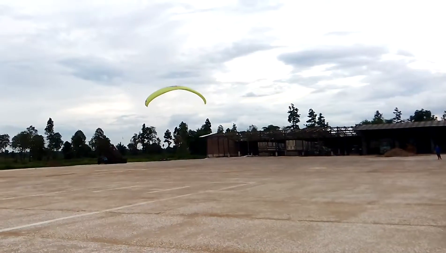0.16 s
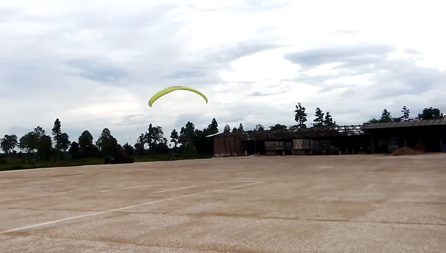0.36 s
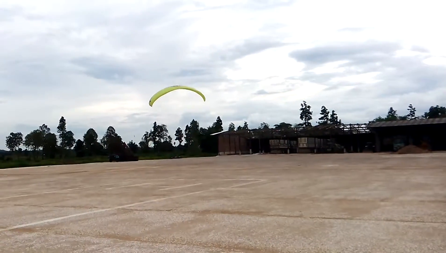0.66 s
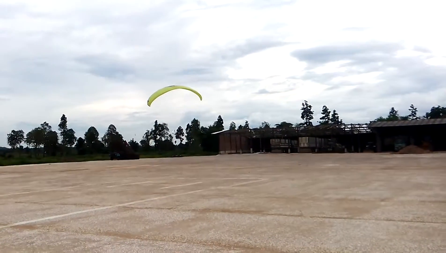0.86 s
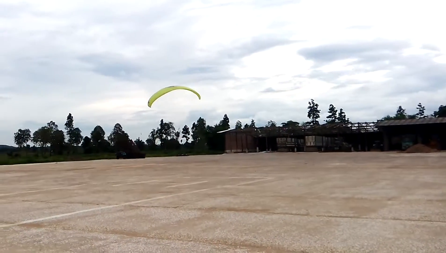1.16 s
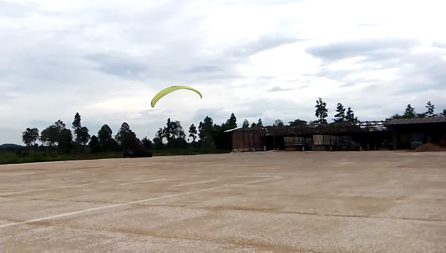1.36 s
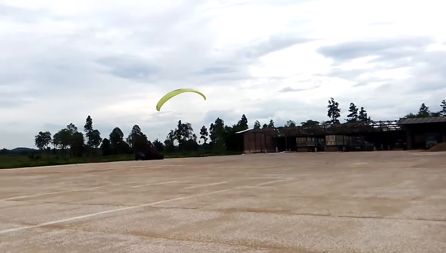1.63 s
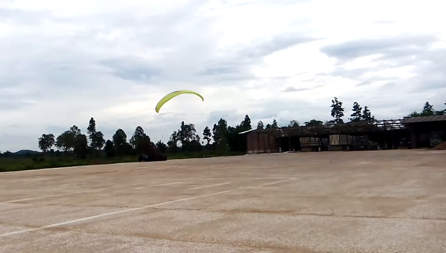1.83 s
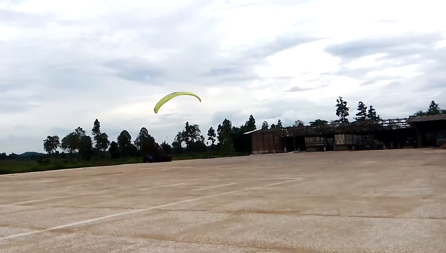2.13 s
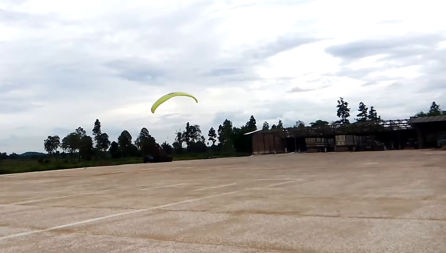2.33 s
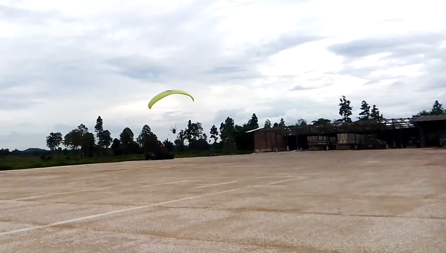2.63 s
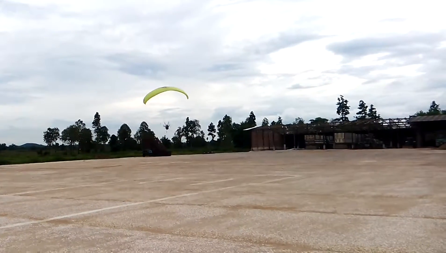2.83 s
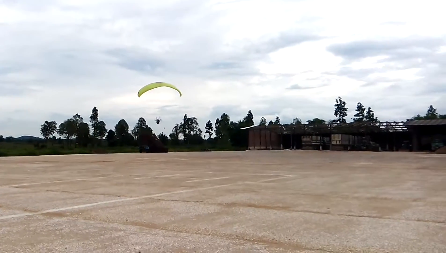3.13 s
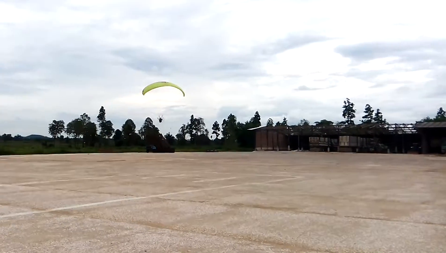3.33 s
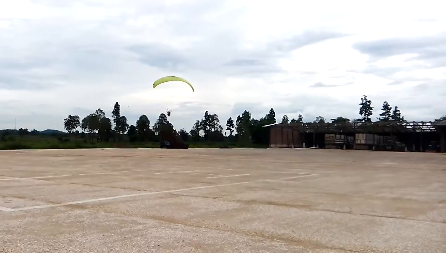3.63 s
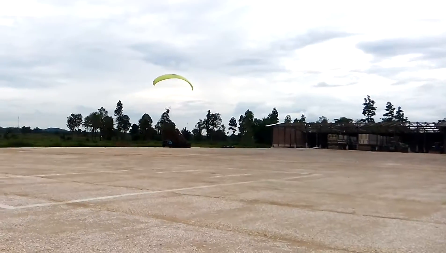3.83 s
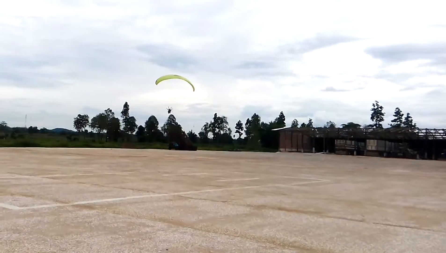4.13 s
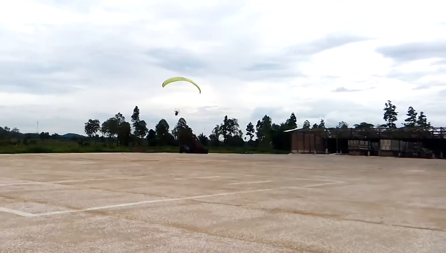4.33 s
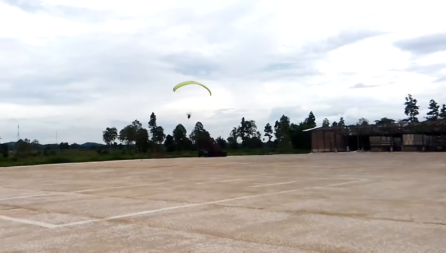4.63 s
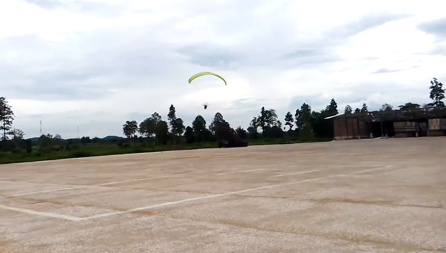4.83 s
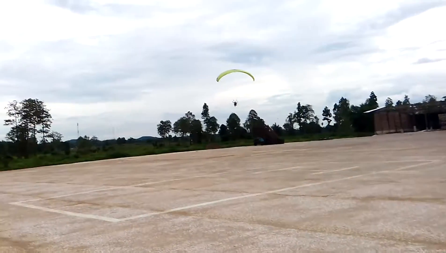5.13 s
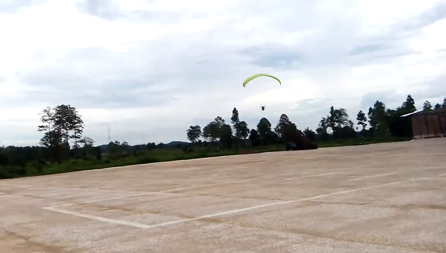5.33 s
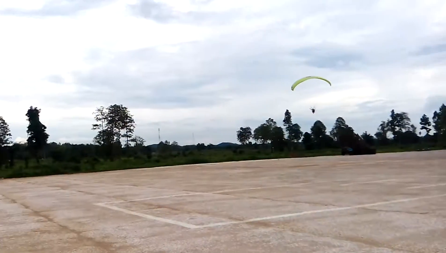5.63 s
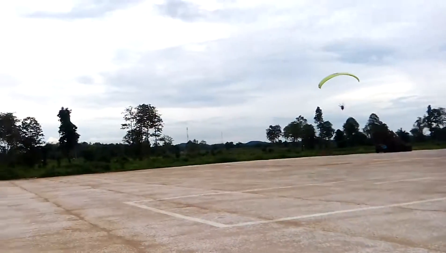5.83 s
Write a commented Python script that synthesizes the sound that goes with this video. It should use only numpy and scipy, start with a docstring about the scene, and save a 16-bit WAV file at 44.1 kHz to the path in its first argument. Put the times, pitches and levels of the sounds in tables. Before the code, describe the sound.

A powered paraglider climbs away at full throttle over a wide paved field. Its small two-stroke engine and propeller make a steady buzzing drone with a raspy edge and an airy hiss. The pitch barely wavers while the drone slowly fades with distance. Light wind rumbles on the microphone underneath, and near the end the tone shifts a little as the microphone turns.

```python
"""Powered paraglider climbing away.

Full throttle over a wide paved field, heard at a phone's two ports. The two-stroke's exhaust blows
through a geared two-blade propeller, which chops it into sum tones; blades and gas hiss. The paving's
echo lags more with height, a shed returns a sharper one, light wind rumbles. Late on, the phone turns."""
import sys
import numpy as np
from scipy import signal
from scipy.fft import rfft, irfft, next_fast_len
from scipy.io import wavfile
from scipy.ndimage import uniform_filter1d, map_coordinates

SR = 44100
rng = np.random.default_rng(int(sys.argv[2]) if len(sys.argv) > 2 else 0)


def transcribe(u):
    """Save the signal u as a 16-bit wav file named by the first command-line argument.

    u: samples, shape (n,) or (channels, n), limited to [-1, 1]; the rate is SR.
    q: integer samples, one column per channel.
    """
    v = np.clip(np.atleast_2d(u).T, -1, 1)
    q = np.round(v * 32767).astype(np.int16)
    wavfile.write(sys.argv[1], SR, q)


N = 263277
TIME = np.arange(N) / SR
FFT_SIZE = next_fast_len(N + 4096)
HZ = np.arange(FFT_SIZE // 2 + 1) * SR / FFT_SIZE
LOG_HZ = np.log(HZ + 1)


def undb(db):
    """dB to gain."""
    return 10 ** (np.asarray(db) / 20)


def curve(table):
    """Columns of a time table at every sample."""
    times_s, *columns = np.transpose(table)
    return [np.interp(TIME, times_s, column) for column in columns]


def contour(table):
    """Gain per FFT bin from (Hz, dB) points."""
    hz, db = np.transpose(table)
    return undb(np.interp(LOG_HZ, np.log(hz), db))


def resonances(modes, hz=HZ):
    """Gain of bell-shaped peaks and notches."""
    return undb(sum(db / (1 + (2 * (hz - centre) / width) ** 2) for centre, width, db in modes))


def filtered(x, response):
    """Apply a frequency response."""
    return irfft(rfft(x, FFT_SIZE) * response, FFT_SIZE)[:N]


def delayed(x, lag_ms):
    """Read through a moving delay."""
    return map_coordinates(x, [np.arange(N) - lag_ms * SR / 1000], order=3, mode="nearest")


def noise(spectrum):
    """Coloured noise, rms 1."""
    x = filtered(rng.standard_normal(N), contour(spectrum))
    return x / x.std()


def wander(rate_hz):
    """Random steps smoothed twice; spread near 1."""
    hold = int(SR / rate_hz)
    steps = np.repeat(rng.standard_normal(N // hold + 1), hold)
    return 1.47 * uniform_filter1d(uniform_filter1d(steps, hold), hold)[:N]


def tone(phase, db, flicker_db, slip_rad, rate_hz):
    """A sine that gusty air makes flicker in level and slip in phase."""
    amplitude = np.sqrt(2) * undb(db + flicker_db * wander(rate_hz))
    return amplitude * np.cos(phase + slip_rad * wander(rate_hz))


def layer_db(name):
    """A layer drifts in level as the craft flies off, and beams towards or away as it swings."""
    # Per layer: starting level in dB, slope in dB/s.
    trends = {"drone": (-21, -2.31), "hiss": (-32.5, -0.41), "whistle": (-43, -0.36), "gas": (-33.5, -0.22),
              "blade tones": (-32, -3), "low exhaust": (-43, -0.064), "middle exhaust": (-41, -0.81),
              "high exhaust": (-41.5, 0.23), "side tones": (-0.68, 0.11), "thump": (-49.5, -1.08),
              "hum": (-64, .1), "shed": (-49.5, 0.1)}
    # Each row: layer, centre in seconds, half length in seconds, lift in dB.
    swells = [("hiss", 0.12, 0.35, 3.2), ("hiss", 1.255, 0.19, 2.7), ("hiss", 3.06, 0.19, 2.6),
              ("hiss", 6.1, 0.26, 2.3), ("whistle", 0.12, 0.27, 6.7), ("whistle", 1.24, 0.14, 5.3),
              ("whistle", 2.12, 0.33, -12), ("whistle", 3.16, 0.19, 6), ("whistle", 3.64, 0.35, 8.4),
              ("whistle", 2.89, 0.2, 3.4), ("whistle", 4.28, 0.23, 3.7), ("whistle", 5.59, 0.16, 5.4),
              ("gas", 0.069, 0.4, 4.3), ("blade tones", 3.1, 0.68, 7.9), ("blade tones", 6.2, 0.35, 2.7),
              ("gas", 6.4, 1, -3.1), ("shed", 2.92, 0.58, 14.4), ("shed", 4.2, 0.75, 2.5),
              ("low exhaust", 0.38, 0.27, 1.9), ("low exhaust", 1, 0.18, -10),
              ("low exhaust", 2.8, 0.45, -2.5), ("low exhaust", 4.75, 1, 6.5),
              ("low exhaust", 4.9, 0.18, 6.4), ("middle exhaust", 0.13, 0.45, 8.6),
              ("middle exhaust", 1.29, 0.15, 4.6), ("middle exhaust", 4.63, 0.28, 3.7),
              ("high exhaust", 3.8, 0.49, 2.2), ("high exhaust", 5.2, 0.27, 5), ("thump", 1, 0.35, 4.3),
              ("thump", 3.4, 0.45, -2.5), ("thump", 5.67, 0.38, 2.6), ("hum", 4.76, 0.43, 9.8),
              ("side tones", 5.6, 0.33, -4.5), ("side tones", 3.5, 1, 0.98), ("drone", 1, 0.57, -0.34),
              ("drone", 3.3, 0.13, -2.3), ("drone", 5.08, 0.058, -2)]
    start_db, db_per_s = trends[name]
    swell_db = sum(db * np.exp(-((TIME - centre_s) / half_s) ** 2)
                   for layer, centre_s, half_s, db in swells if layer == name)
    return start_db + db_per_s * TIME + swell_db


def rush(fire_rad, shaft_rad):
    """Exhaust gas, tip hiss and whistle, pulsing at each firing and blade pass."""
    # Noise spectra. Each row: frequency in Hz, relative density in dB.
    gas_spectrum = [(90, -21), (130, -13), (300, -4), (450, -12.5), (700, 1), (1000, -8.5), (1400, -9),
                    (2200, -47)]
    hiss_spectrum = [(1000, -37), (1600, 3.5), (3000, -0.5), (5000, -3), (6800, -7), (8000, -15.5),
                     (10600, -14.5), (12000, -28.5), (15300, -41)]
    whistle_spectrum = [(4500, -58), (5000, 5.5), (5600, 6.5), (5900, 1.5), (6400, 4), (7000, -30.5)]
    gas = undb(layer_db("gas")) * noise(gas_spectrum)
    hiss = undb(layer_db("hiss")) * noise(hiss_spectrum)
    whistle = undb(layer_db("whistle")) * noise(whistle_spectrum)
    firing, blade_pass = np.cos(fire_rad), np.cos(2 * shaft_rad)
    puffs = gas * (1 + 0.084 * firing + 0.12 * blade_pass)
    return puffs + (hiss + whistle) * (1 + 0.068 * firing + 0.072 * blade_pass)


def air_path(x, slow_db=1.24, quick_db=1.43, loss_db_per_s_at_10khz=0.18):
    """Turbulence swells each band on its own; the lengthening path absorbs treble."""
    centres_hz = np.geomspace(80, 16000, num=12)
    heard = np.zeros(N)
    for hz in centres_hz:
        band = filtered(x, np.interp(LOG_HZ, np.log(centres_hz), centres_hz == hz))
        loss_db = loss_db_per_s_at_10khz * TIME * (hz / 10000) ** 2
        heard += band * undb(slow_db * wander(2.86) + quick_db * wander(14) - loss_db)
    return heard


def drone(fire_rad, shaft_rad, waver_db=0.4):
    """The blades chop and wobble the exhaust pulse; firing rate + blade rate is the loudest tone."""
    # Each row: firing multiple, shaft multiple, relative level in dB, slope in dB/s.
    partials = [(0, 4, -19.5, 1), (0, 8, -18, 0.52), (1, 0, -16, 1), (1, 1, -19.5, 1.5), (1, 2, 1, 0.5),
                (1, 3, -12.5, 1.39), (1, 4, -19, 2), (2, 0, -19, 0.5), (2, 2, -27.5, 1.5)]
    gain = undb(layer_db("drone") + waver_db * wander(5.5))
    side_db = layer_db("side tones")
    lead_rad = {(1, 0): np.pi, (1, 1): np.pi, (1, 4): np.pi / 2}  # sideband phases of the wobble
    tones = np.zeros(N)
    for m, k, db, db_per_s in partials:
        phase = m * fire_rad + k * shaft_rad + lead_rad.get((m, k), 0)
        level_db = db + db_per_s * TIME + side_db * ((m, k) != (1, 2))
        tones += tone(phase, level_db, flicker_db=0.68, slip_rad=0.17, rate_hz=9.9)
    return gain * tones


def bass(shaft_rad, hum_hz=101.7):
    """One thump per blade pass, and a faint wavering hum."""
    thump = tone(2 * shaft_rad, layer_db("thump"), flicker_db=3, slip_rad=0.22, rate_hz=5.74)
    hum = tone(2 * np.pi * hum_hz * TIME, layer_db("hum"), flicker_db=3.5, slip_rad=3.7, rate_hz=5.4)
    return thump + hum


def rasp(fire_rad, shaft_rad):
    """Higher, less steady overtones of blade passes and firings."""
    # Each row: shaft multiple, relative level in dB.
    blade_partials = [(10, -16.5), (14, -15.5), (16, -24), (18, -7), (20, -4.5), (22, -12), (24, -7.5),
                      (32, -8)]
    # Three groups. Each row: firing multiple, shaft multiple, relative level in dB.
    exhaust_groups = [
        [(4, 0, 5), (4, 2, -16)],
        [(3, 0, -8), (4, 4, -3), (5, 0, -9), (5, 4, -3.5), (6, 0, -6.5)],
        [(7, 2, -16), (8, 0, -2.5), (9, 0, -5.5), (9, 2, -22), (10, 0, -27), (12, 0, -5.5), (15, 0, -12)],
    ]
    blades = sum(tone(k * shaft_rad, db, flicker_db=3, slip_rad=1.58, rate_hz=14)
                 for k, db in blade_partials)
    exhaust = np.zeros(N)
    for name, partials in zip(("low exhaust", "middle exhaust", "high exhaust"), exhaust_groups):
        group = sum(tone(m * fire_rad + k * shaft_rad, db, flicker_db=2.45, slip_rad=0.5, rate_hz=14)
                    for m, k, db in partials)
        exhaust += undb(layer_db(name)) * group
    return undb(layer_db("blade tones")) * blades + exhaust


def shed_echo(fire_hz, shaft_hz, lag_s=0.12, doppler_ratio=1.024):
    """A long shed returns some tones late, raised in pitch as the craft nears it."""
    # Each row: firing multiple, shaft multiple, relative level in dB.
    partials = [(0, 4, -7.5), (4, 0, -10), (6, 0, -3), (8, 0, -2.5)]
    echo_hz = [doppler_ratio * np.interp(TIME - lag_s, TIME, hz) for hz in (fire_hz, shaft_hz)]
    fire_rad, shaft_rad = 2 * np.pi * np.cumsum(echo_hz, axis=1) / SR
    echo = sum(tone(m * fire_rad + k * shaft_rad, db, flicker_db=2.5, slip_rad=0.45, rate_hz=9)
               for m, k, db in partials)
    return undb(layer_db("shed")) * echo


def ground_echo(x, cutoff_hz=6500):
    """A duller copy off the paving, later and stronger as the craft climbs."""
    # Each row: time in seconds, lag in ms, gain.
    reflection = [(0, .46, .45), (2.2, .47, .5), (2.75, .5, .55), (3.35, .54, .65), (3.65, .575, .65),
                  (3.95, .63, .65), (4.25, .66, .65), (4.55, .71, .7), (4.85, .76, .8), (5.15, .78, .8),
                  (5.45, .8, .75), (5.97, .83, .75)]
    lag_ms, gain = curve(reflection)
    dull = filtered(x, 1 / np.sqrt(1 + (HZ / cutoff_hz) ** 2))
    return gain * delayed(dull, lag_ms)


def scattered_rush(fire_rad, shaft_rad):
    """Scattered gas and blade noise that reaches one port alone."""
    # Each row: frequency in Hz, gain in dB.
    share = [(300, -14.5), (550, -4), (800, -13), (1150, -2), (1500, -4.5), (2000, -4.5), (3300, -4),
             (4200, -4.5), (5500, -4.5), (7000, -1), (8000, -0.5), (12000, 0)]
    return filtered(rush(fire_rad, shaft_rad), contour(share))


def left_port(x):
    """The port's cavity colours the sound."""
    # Each row: centre in Hz, width in Hz, gain in dB.
    modes = [(650, 210, 3), (950, 170, -1.5), (1170, 190, 4), (2720, 380, 4), (3480, 640, -0.5),
             (4300, 250, 1), (5150, 820, 2), (6620, 140, 6), (7130, 1400, 0.5)]
    return filtered(x, resonances(modes))


def right_port(direct, ground, ground_cutoff_hz=2380, path_stretch=0.215):
    """Sound bends round the body until the phone turns and the straight path takes over."""
    # Each row: frequency in Hz, gain in dB.
    tilt = [(30, -2), (150, -4), (1500, 1.5), (2500, -0.5), (7500, 2), (9000, -11), (10700, -9),
            (11300, -30), (15300, -19)]
    # Port shaded, swinging, facing the craft. Each row: centre in Hz, width in Hz, gain in dB.
    shaded_modes = [(325, 1000, 3.5), (622, 85, -10), (924, 120, 6), (1490, 430, 1.5), (1780, 180, -18),
                    (2074, 270, 9.5), (2145, 580, -7), (2860, 260, 5), (3320, 980, -1), (4180, 114, 7.5),
                    (4380, 180, -2), (5280, 520, 11), (5750, 220, -3), (6180, 330, 8.5), (7450, 1300, 3)]
    swing_modes = [(3060, 240, 9), (4880, 250, 8), (6300, 320, 3)]
    facing_modes = [(270, 1100, 4), (500, 95, 2), (850, 92, -10), (1230, 350, 5), (1580, 260, -8),
                    (2250, 560, -7.5), (3270, 820, 1), (4700, 370, 2), (5000, 240, 7.5), (5650, 200, 0),
                    (6100, 1000, 7)]
    # Each row: frequency in Hz, phase behind the left port in radians.
    shaded_lag = [(0, 0), (250, .12), (520, 1), (690, 0), (1000, .1), (1130, 2.4), (1720, 2.4), (1900, 1.4),
                  (2250, 3.7), (2900, 9.3), (3100, 9.8), (3600, 15.5), (4050, 19.3), (4600, 21.9),
                  (4800, 20.9), (5050, 22), (5700, 24.1), (6000, 23.2), (6400, 25.6), (6600, 24.4),
                  (7000, 25.5), (7700, 26.8), (14900, 33)]
    facing_lag = [(0, 0), (600, .6), (1000, 1.9), (1200, 1.5), (1550, 3.7), (1800, 2.5), (2100, 4.7),
                  (2400, 8.5), (3000, 11.1), (3500, 15.6), (4200, 17.2), (4400, 15.9), (5000, 17.8),
                  (5700, 18.9), (6500, 20.6), (7900, 24.7), (14900, 33)]
    # Each row: time in seconds, share turned, earlier arrival in ms, share arriving straight.
    turn = [(0, 0, 0, 0), (3.4, 0, 0, 0), (4.3, .1, .005, 0), (4.7, .2, .02, 0), (4.82, .38, .035, .05),
            (5, .8, .06, .15), (5.15, 1, .085, .35), (5.4, 1, .12, .9), (5.97, .95, .18, 1)]
    turned, early_ms, straight = curve(turn)
    dull_ground = filtered(ground, 1 / np.sqrt(1 + (HZ / ground_cutoff_hz) ** 4))
    arriving = filtered(direct + dull_ground, contour(tilt))
    framing = dict(fs=SR, nperseg=2048, noverlap=1536)
    hz, frame_s, spectra = signal.stft(arriving, **framing)
    turned, straight = np.interp(frame_s, TIME, turned), np.interp(frame_s, TIME, straight)
    slid_hz = np.outer(hz, 1 + path_stretch * turned)  # a longer path slides the pattern down
    swing = np.clip(3 * turned - 0.4, 0, 1)
    shaded_gain = resonances(shaded_modes, slid_hz) * resonances(swing_modes, slid_hz) ** swing
    shaded = shaded_gain * np.exp(-1j * np.interp(slid_hz, *np.transpose(shaded_lag)))
    facing = resonances(facing_modes, hz) * np.exp(-1j * np.interp(hz, *np.transpose(facing_lag)))
    response = shaded * (1 - straight) + np.outer(facing, straight)
    _, heard = signal.istft(spectra * response, **framing)
    return delayed(heard[:N], -early_ms)


def wind(level_db=-51, gust_db=2.2, side_db=-17):
    """Light wind rumbles, slightly differently at each port."""
    # Each row: frequency in Hz, relative density in dB.
    spectrum = [(15, 52), (35, 22), (50, -21), (70, -4), (120, 0), (200, -44)]
    rumble = noise(spectrum) * undb(level_db + gust_db * wander(4.7))
    buffet = rumble.std() * noise(spectrum) * undb(side_db)
    return np.array([rumble + buffet, rumble - buffet])


def scene():
    """The craft, its echoes and wind at both ports."""
    # Each row: time in seconds, firing rate + blade rate in Hz.
    pitch = [(0, 237.5), (.12, 238), (.32, 240), (.52, 241.4), (.9, 243.4), (1.12, 241.1), (1.36, 242.4),
             (1.58, 239.8), (2.1, 239.9), (2.35, 242), (2.72, 243.8), (2.9, 242.6), (3.12, 238.9),
             (3.32, 239.9), (3.72, 244.2), (3.92, 245.2), (4.34, 245.3), (4.68, 242.8), (5.14, 244),
             (5.36, 243.6), (5.72, 242), (5.97, 241.4)]
    sum_tone_hz, = curve(pitch)
    shaft_hz = 40.94 + 0.155 * TIME  # propeller speed
    fire_hz = sum_tone_hz - 2 * shaft_hz
    fire_rad, shaft_rad = 2 * np.pi * np.cumsum([fire_hz, shaft_hz], axis=1) / SR
    craft = air_path(rush(fire_rad, shaft_rad))
    craft += drone(fire_rad, shaft_rad) + bass(shaft_rad) + rasp(fire_rad, shaft_rad)
    craft += shed_echo(fire_hz, shaft_hz)
    ground = ground_echo(craft)
    left = left_port(craft + ground + scattered_rush(fire_rad, shaft_rad))
    right = right_port(craft + scattered_rush(fire_rad, shaft_rad), ground)
    return np.array([left, right]) + wind()


def record(dry, fade_s=0.004, cutoff_hz=15350):
    """A few milliseconds of fade keep both ends click-free; the top treble is cut."""
    fade = np.clip(np.minimum(TIME, TIME[::-1]) / fade_s, 0, 1)
    lowpass = signal.ellip(12, 0.2, 80, cutoff_hz, fs=SR, output="sos")
    return signal.sosfilt(lowpass, dry * fade)


dry = scene()
out = record(dry)
transcribe(out)
```